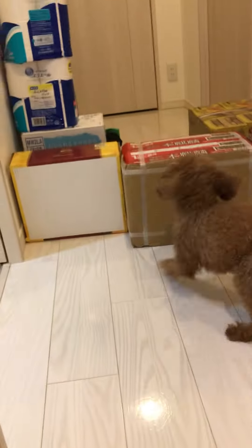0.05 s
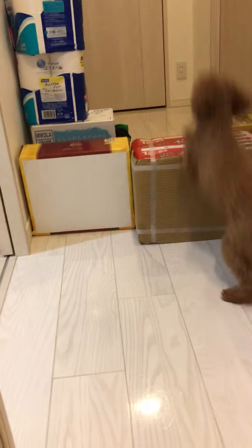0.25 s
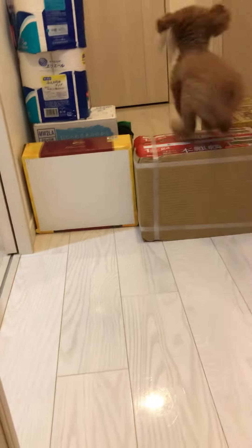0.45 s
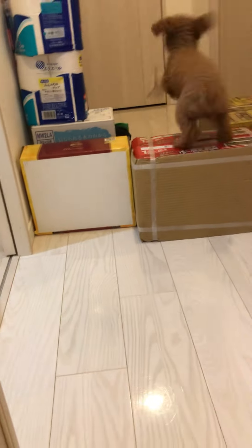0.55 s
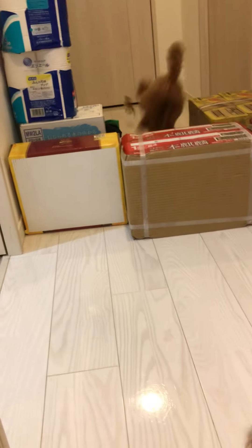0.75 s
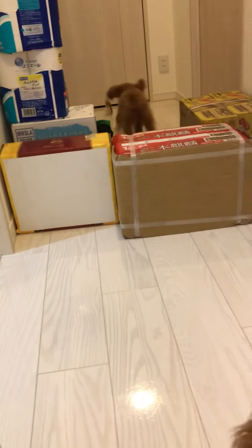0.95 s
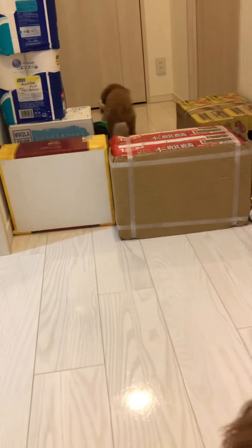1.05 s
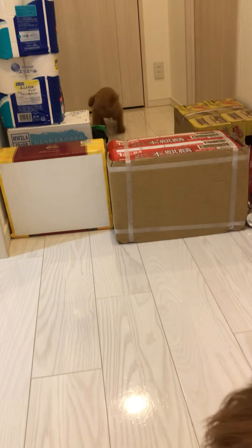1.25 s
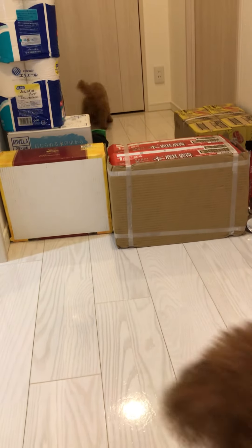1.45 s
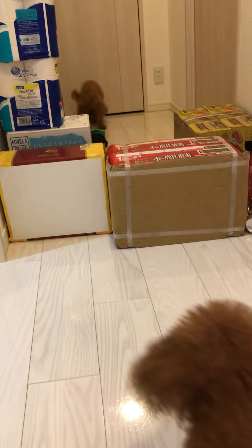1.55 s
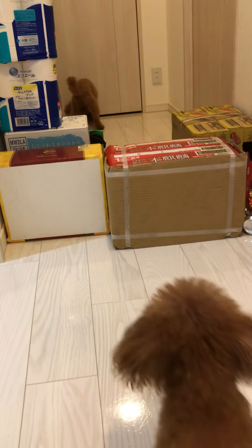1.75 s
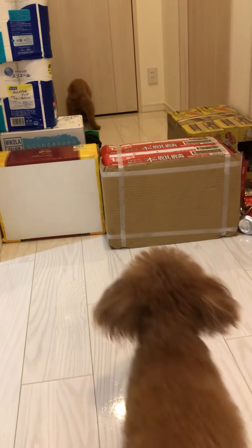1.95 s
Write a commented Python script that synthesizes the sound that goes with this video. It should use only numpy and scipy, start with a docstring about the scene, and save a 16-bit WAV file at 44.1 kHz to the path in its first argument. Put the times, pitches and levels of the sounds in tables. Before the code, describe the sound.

Claws click sharply near the microphone as a small dog springs onto a cardboard box with hollow thumps and scrapes. It lands softly and skitters off along a hard hallway floor, with another dog's faint steps nearby.

```python
"""A small dog leaps onto a cardboard box in a hallway with a hard floor.
Its paws scuff and its claws click as it springs; its weight thumps the lid and sets the box
ringing, and it scrabbles across and lands beyond on soft pads. Its claws then patter and rasp
away down the echoing hall, while a second dog ticks softly close by over a low room murmur."""
import sys
import numpy as np
from scipy import signal
from scipy.io import wavfile

SR = 44100
rng = np.random.default_rng(int(sys.argv[2]) if len(sys.argv) > 2 else 0)


def inscribe(sig):
    """Save sig as 16-bit PCM at rate SR to the path in sys.argv[1].

    A 1-D sig is mono; a 2-D sig holds one channel per row.
    Samples are clipped to [-1, 1] before scaling.
    """
    pcm = np.round(np.clip(np.atleast_2d(sig).T, -1, 1) * 32767)
    wavfile.write(sys.argv[1], SR, pcm.astype(np.int16))


N = 88200
T = np.arange(SR // 4) / SR  # time axis of one contact, s
HZ = np.fft.rfftfreq(8192, 1 / SR)


def amp(db):
    """Decibels to gain."""
    return 10 ** (np.asarray(db) / 20)


def curve(points):
    """(f/Hz, value) points interpolated onto HZ in log frequency."""
    hz, value = np.transpose(points)
    return np.interp(np.log(HZ + 1), np.log(hz), value)


def add(mix, start_s, sound):
    """Adds a sound to the mix in place."""
    part = mix[max(round(start_s * SR), 0):][:len(sound)]
    part += sound[:len(part)]


def colour(x, gain_db):
    """Minimum-phase filter of unit energy, shaped by gain_db."""
    log_gain = np.log(amp(np.maximum(gain_db, gain_db.max() - 80)))
    mirrored = np.concatenate([log_gain, log_gain[-2:0:-1]])
    response = np.exp(np.conj(signal.hilbert(mirrored)))
    taps = np.fft.ifft(response).real[:len(HZ)]
    return signal.fftconvolve(x, taps / np.linalg.norm(taps))[:len(x)]


def pulse(rise_s, decay_s):
    """Envelope with exponential rise and decay."""
    return (1 - np.exp(-T / rise_s)) * np.exp(-T / decay_s)


def grit(envelope, grain_db):
    """Friction: tiny slips of uneven size, with the envelope's shape and energy."""
    noise = rng.standard_normal(len(envelope))
    size_db = grain_db * np.minimum(rng.exponential(1, len(envelope)), 4)
    slips = noise * amp(size_db) * envelope
    return slips * np.linalg.norm(envelope) / np.linalg.norm(slips)


def strike(db, decay_s, tilt_db_oct, tone, rise_s, grain_db):
    """One contact: a gritty burst, its tone tilted above 500 Hz."""
    envelope = pulse(rise_s, decay_s)
    burst = grit(envelope / envelope.max(), grain_db)
    octaves = np.log2(np.maximum(HZ, 500) / 500)
    return amp(db) * colour(burst, curve(tone) + tilt_db_oct * octaves)


def strikes(rows, tone, rise_s, grain_db):
    """A run of contacts sharing one tone."""
    out = np.zeros(N)
    for start_s, db, decay_s, tilt_db_oct in rows:
        add(out, start_s, strike(db, decay_s, tilt_db_oct, tone, rise_s, grain_db))
    return out


def ring(modes):
    """Decaying sines of a struck object."""
    return sum(amp(db - 60 * T / t60) * np.sin(2 * np.pi * hz * T) for hz, db, t60 in modes)


def rasp(envelope, hz, width_oct=0.026):
    """A dragging claw chatters in a narrow band."""
    band_db = -15 * np.log10(1 + (np.log2((HZ + 1) / hz) / width_oct) ** 2)
    return colour(grit(envelope, grain_db=3.5), band_db)


# room air spectrum: f/Hz, relative level/dB
AIR_TONE = [(20, -5.5), (45, 5.5), (65, 3.5), (130, 0.5), (190, -11.5), (270, -2.5), (450, -20.5),
            (1000, -14), (2500, -33), (8000, -48), (15000, -35)]

def room_tone(level_db=-54.5):
    """Steady low murmur of the room's air."""
    noise = rng.standard_normal(N + len(HZ))
    return amp(level_db) * colour(noise, curve(AIR_TONE))[-N:]


# hallway decay: f/Hz, t60/s
HALL_T60 = [(100, 1.58), (200, 0.48), (280, 0.35), (600, 0.6045), (1400, 0.51), (4000, 0.5668),
            (9000, 0.4052), (15000, 0.34)]

def hall(x, wet_db, build_s, drift_hz=17):
    """Direct sound plus dense reflections; two tails crossfade, as echoes shift when the dogs move."""
    noise = rng.standard_normal((2, SR * 3 // 4))
    hz, t, spectra = signal.stft(noise, SR, nperseg=256)
    t60 = np.interp(hz, HZ, curve(HALL_T60))[:, None]
    tails = signal.istft(spectra * amp(-60 * t / t60), SR)[1]
    tails *= 1 - np.exp(-np.arange(tails.shape[1]) / SR / build_s)
    tails /= np.linalg.norm(tails, axis=1, keepdims=True)
    phase = 2 * np.pi * drift_hz * np.arange(len(x)) / SR
    crossfade = np.array([np.cos(phase), np.sin(phase)])
    wet = signal.fftconvolve(x * crossfade, tails, axes=1).sum(0)
    return x + amp(wet_db) * wet[:len(x)]


# second dog's claws: t/s, level/dB, decay/s, tilt/(dB/oct)
CLAW_TICKS = [(.8255, -35.5, .004, 3.5), (.928, -36.5, .003, 3), (1.270, -54, .004, -7),
              (1.312, -42, .004, 14), (1.562, -43.5, .003, -2), (1.735, -51.5, 0.017, 5),
              (1.7615, -46.5, 0.0073, -1), (1.826, -50.5, .002, 5.5), (1.853, -51.5, .002, -6.5),
              (1.8655, -42.5, 0.0025, -3.5)]
# tick spectrum: f/Hz, relative level/dB
TICK_TONE = [(100, -13), (1300, -21), (2300, -10.5), (2700, -1), (3200, -11.5), (3950, -13), (4450, 3),
             (5100, -7), (6000, -5), (6750, 3.5), (8000, -6.5), (10500, -7), (12500, -5.5), (15000, -8)]

def second_dog():
    """Claws touch down lightly close by."""
    ticks = strikes(CLAW_TICKS, TICK_TONE, rise_s=0.0006, grain_db=3.5)
    return hall(ticks, wet_db=-7, build_s=0.003)


# pads on the floor: t/s, level/dB, f/Hz
PAD_TAPS = [(.075, -46, 310), (.128, -38, 179), (.148, -37.5, 678), (0.192, -42, 313), (.222, -39, 676),
            (.24, -48.5, 670), (0.295, -40, 450), (.538, -31.5, 800), (.59, -32.5, 356), (.738, -38, 330),
            (0.741, -41, 174), (.76, -40, 612), (0.861, -37, 292), (0.947, -41, 328), (1.002, -44, 293),
            (1.005, -49, 885), (1.074, -39, 276), (1.124, -44.5, 276), (1.15, -41, 122),
            (1.181, -39.5, 137), (1.302, -42, 146), (1.304, -47, 481), (1.358, -44.5, 747),
            (1.623, -52.5, 289)]

def pads(width_oct=0.46, swing_db=-5):
    """Soft pads tap dully: a puff of band noise and a slight damped swing at its pitch."""
    out = np.zeros(N)
    envelope = pulse(rise_s=0.0019, decay_s=0.017)
    envelope /= envelope.max()
    for start_s, db, hz in PAD_TAPS:
        band_db = -10 * np.log10(1 + (np.log2((HZ + 1) / hz) / width_oct) ** 4)
        puff = colour(envelope * rng.standard_normal(len(T)), band_db)
        swing = amp(swing_db) * envelope * np.sin(2 * np.pi * hz * T)
        add(out, start_s, amp(db) * (puff + swing))
    return hall(out, wet_db=-6, build_s=0.0064)


# paw slides: peak t/s, level/dB, half length/s
PAW_SLIDES = [(.004, -60.5, .02), (0.057, -37, 0.015), (.158, -45, 0.025)]
# slide spectrum: f/Hz, relative level/dB
SLIDE_TONE = [(100, -20), (500, -6), (1300, 0.5), (2500, -5), (4600, -1.5), (5600, -4), (6650, -2),
              (7700, -8.5), (9500, -6), (12000, -12.5), (15500, -9)]

def scuffs(squeak_hz=6630, squeak_db=1):
    """Paws slide on the floor, swelling and fading, with a thin squeak of claws."""
    t = np.arange(N) / SR
    envelope = np.zeros(N)
    for peak_s, db, half_s in PAW_SLIDES:
        envelope += amp(db) * np.exp(-np.abs((t - peak_s) / half_s) ** 1.74)
    rub = colour(grit(envelope, grain_db=2.1), curve(SLIDE_TONE))
    return hall(rub, wet_db=-1.5, build_s=0.002) + amp(squeak_db) * rasp(envelope, squeak_hz)


# claws down the hall: t/s, level/dB, rise/s, decay/s, tilt/(dB/oct), rasp f/Hz, rasp re level/dB
FAR_SKIDS = [(.738, -32.5, 0.001, 0.015, -0.5, 7100, -12), (0.945, -41.5, 0.0027, 0.017, -1.5, 6860, -27),
             (.996, -36, 0.0061, 0.01, -0.5, 12400, -4), (1.003, -30.5, 0.0016, 0.0056, 2.5, 7200, -2),
             (1.059, -40, .005, 0.015, 1.5, 4670, -4), (1.077, -37.5, .004, .008, 2.5, 4680, -11),
             (1.118, -33.5, 0.0084, 0.0084, 0.5, 7100, -8), (1.171, -27.5, 0.0022, 0.0044, 1.5, 8500, -9),
             (1.178, -30.5, 0.0028, 0.0044, 0.5, 4430, -3), (1.3, -41.5, 0.0041, 0.015, -1, 4580, -2),
             (1.356, -36, 0.01, 0.012, -0.5, 7140, 0), (1.572, -52.5, 0.0091, .02, -4.5, 4550, -1),
             (1.618, -38.5, 0.0011, 0.0064, -3.5, 4080, -3.5),
             (1.628, -40, 0.00077, 0.0026, -2, 3370, -7.5), (1.650, -62, 0.0016, 0.0096, -11.5, 2400, 3)]
# skid spectrum: f/Hz, relative level/dB
SKID_TONE = [(100, -27), (500, -11.5), (1100, -5), (2200, -5.5), (3700, -4), (4500, 1), (5600, -0.5),
             (7000, 4), (7700, -2.5), (8800, 2.5), (10300, -3.5), (12000, -2.5), (15500, -7.5)]

def far_claws(rasp_decay_s=0.032):
    """Each skid rasps at its own pitch and, from a new spot in the hall, has its own echo."""
    out = np.zeros(N)
    for start_s, db, rise_s, decay_s, tilt_db_oct, rasp_hz, rasp_db in FAR_SKIDS:
        skid = strike(db, decay_s, tilt_db_oct, SKID_TONE, rise_s, grain_db=3)
        add(out, start_s, hall(np.pad(skid, (0, len(T))), wet_db=1.2, build_s=0.0019))
        add(out, start_s, amp(db + rasp_db) * rasp(pulse(rise_s, rasp_decay_s), rasp_hz))
    return out


# leaping dog's claws: t/s, level/dB, decay/s, tilt/(dB/oct)
NEAR_CLICKS = [(.1372, -27.5, 0.0024, 2), (.160, -39, 0.0023, 13), (.195, -34, 0.0037, 0),
               (.2257, -12, 0.00025, 1.5), (.2268, -6.5, 0.00037, 5.5), (.2388, -19, 0.0051, 2.5),
               (.2419, -14, .0007, 3), (.243, -18.5, 0.0029, -2), (.296, -17, 0.0034, 2.5),
               (.3005, -29.5, 0.0035, -8), (.312, -57, 0.0025, -8), (.351, -39, 0.0023, 10),
               (.398, -36, 0.012, 7), (.4835, -26, 0.011, 1.5), (.494, -32, 0.0018, -3),
               (.5925, -25.5, 0.0026, 6), (.607, -26, 0.0038, -5), (.627, -32.5, 0.009, 0)]
# click spectrum: f/Hz, relative level/dB
CLICK_TONE = [(100, -1), (500, -20.5), (1200, 2.5), (2800, -5), (4400, 0.5), (6200, 1), (8800, 3.5),
              (10200, -4.5), (11500, -2.5), (15500, -12)]
# floor modes under a claw: f/Hz, level/dB, t60/s
FLOOR_MODES = [(4635, -67, .16), (5370, -56.5, .13), (6051, -62, .11), (6450, -36.5, 0.066),
               (6876, -61, 0.28), (8720, -99.5, .11), (8760, -56.5, .1), (9125, -56.5, .13),
               (11300, -67, .12)]

def near_claws(scatter_db=-6):
    """Sharp clicks ring the floor faintly and are thrown straight back by the box."""
    clicks = strikes(NEAR_CLICKS, CLICK_TONE, rise_s=0.00016, grain_db=3.5)
    clicks += signal.fftconvolve(clicks, ring(FLOOR_MODES))[:N]
    scatter = grit(pulse(rise_s=0.0015, decay_s=0.0041), grain_db=0.5)
    box_echo = signal.fftconvolve(clicks, scatter / np.linalg.norm(scatter))[:N]
    return hall(clicks + amp(scatter_db) * box_echo, wet_db=-8.5, build_s=0.0011)


# paws on cardboard: t/s, level/dB, decay/s, tilt/(dB/oct)
BOX_KNOCKS = [(.350, -25.5, 0.023, -0.5), (.397, -20.5, 0.009, -4.5), (.420, -35.5, 0.045, 0),
              (.445, -41, 0.023, -14), (.485, -31, 0.056, 1.5), (.513, -31, 0.02, 2),
              (.535, -26.5, 0.018, 2.5), (.556, -31.5, 0.044, 5), (.594, -30, 0.0078, 6.5),
              (.609, -28.5, .012, 4), (.626, -27.5, 0.0079, 3.5)]
# cardboard spectrum: f/Hz, relative level/dB
CARDBOARD_TONE = [(80, -15), (280, 3.5), (450, -16.5), (800, -7.5), (1200, -7.5), (1700, -9), (2300, -10.5),
                  (3000, -11.5), (4300, -16), (5300, -21.5), (9000, -31.5), (15500, -33.5)]
# front wall modes: f/Hz, level/dB, t60/s
WALL_MODES = [(1053, -4.5, 0.14), (1188, -3, 0.13), (1228, 0, 0.21), (1332, 3, 0.09), (1602, 2, 0.045),
              (2190, -0.5, 0.057), (2262, -10, .06)]
# blows to that wall: t/s, level/dB
WALL_BLOWS = [(0.352, -37), (0.3982, -25.5), (0.54, -50), (0.593, -36)]

def box_scrabble(wall_rise_s=0.0014):
    """Paws knock and scrape the cardboard; some blows ring the hollow box's front wall."""
    out = strikes(BOX_KNOCKS, CARDBOARD_TONE, rise_s=0.00089, grain_db=2.5)
    wall = ring(WALL_MODES) * (1 - np.exp(-T / wall_rise_s))
    for start_s, db in WALL_BLOWS:
        add(out, start_s, amp(db) * wall)
    return hall(out, wet_db=-6.5, build_s=0.0024)


# dog's weight on the lid: t/s, level/dB, f/Hz
LID_THUMPS = [(0.3568, -20, 120), (.399, -24.5, 135), (.407, -25, 172), (.498, -13.5, 134.5),
              (.556, -21.5, 148), (0.59, -28, 102), (0.609, -21.5, 148)]
# box modes: f/Hz, level/dB, t60/s
BOX_MODES = [(91, -24.5, 0.19), (124, -8.5, 0.091), (162.2, -16, 0.22), (274.4, -16, 0.49),
             (320.5, -15.5, 0.12)]

def box_thumps(rise_s=0.0033):
    """The lid gives under the dog, swings about twice and leaves the box ringing."""
    out = np.zeros(N)
    age = T / rise_s
    envelope = (age / 2) ** 2 * np.exp(2 - age)  # peaks at 1 when age = 2
    box_ring = (1 - np.exp(-age)) * ring(BOX_MODES)
    for start_s, db, hz in LID_THUMPS:
        swing = envelope * np.sin(2 * np.pi * hz * T)
        add(out, start_s, amp(db) * (swing + box_ring))
    return hall(out, wet_db=-18.5, build_s=0.014)


def scene():
    """All sources, mono."""
    claws = near_claws() + second_dog() + far_claws()
    return (claws + scuffs() + box_scrabble() + box_thumps() + pads() + room_tone())[None]


def record(dry):
    """Microphone bass roll-off, then a steep treble limit."""
    low_cut_hz, high_cut_hz = 59, 15750
    highpass = signal.butter(2, low_cut_hz, "highpass", fs=SR, output="sos")
    lowpass = signal.firwin(601, high_cut_hz, window=("kaiser", 9), fs=SR)
    return signal.oaconvolve(signal.sosfilt(highpass, dry), lowpass[None], "same")


dry = scene()
out = record(dry)
inscribe(out)
```